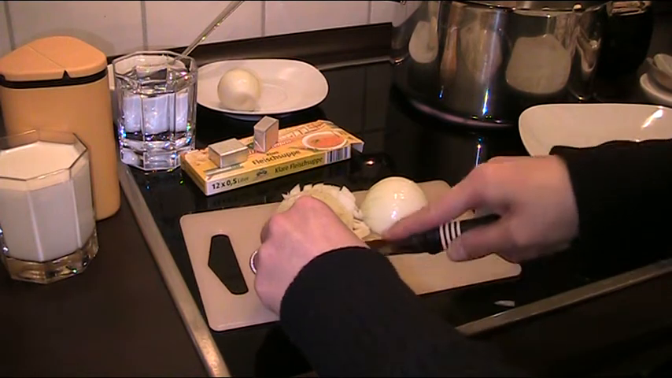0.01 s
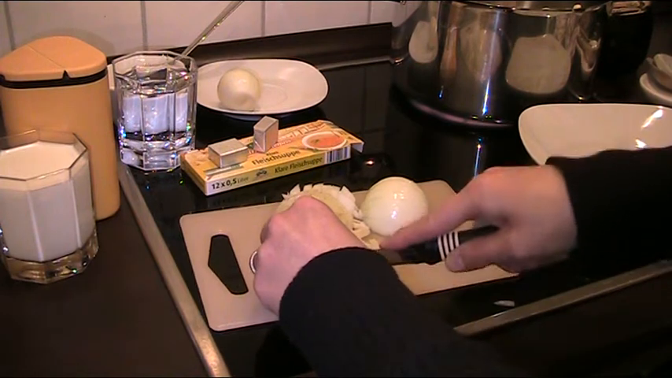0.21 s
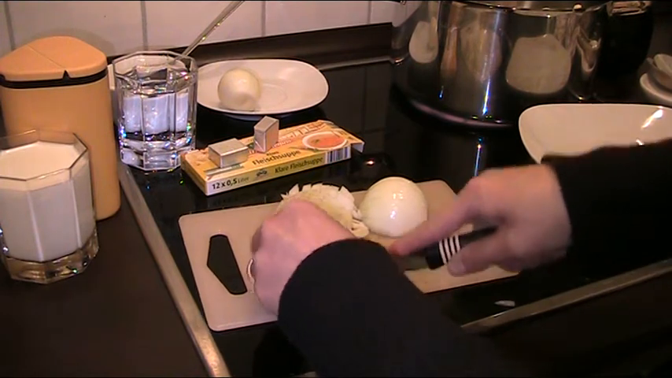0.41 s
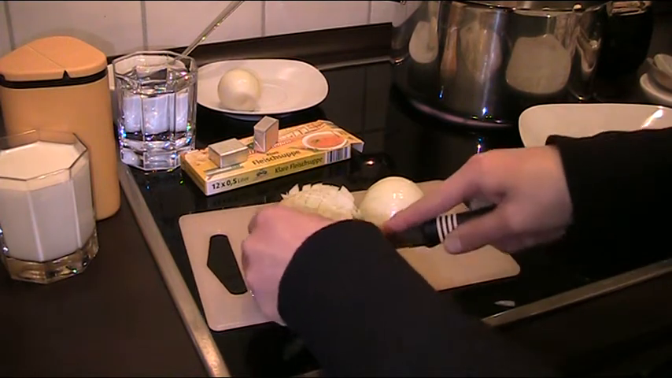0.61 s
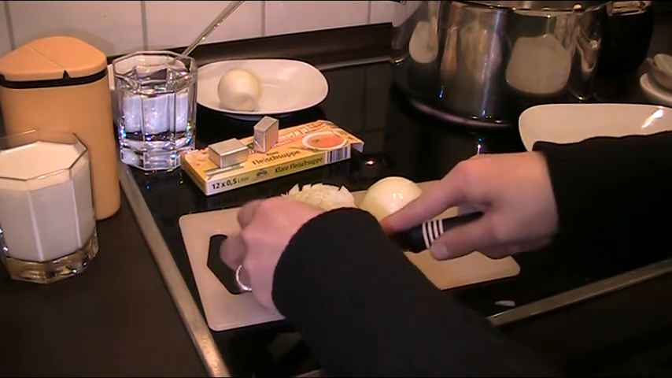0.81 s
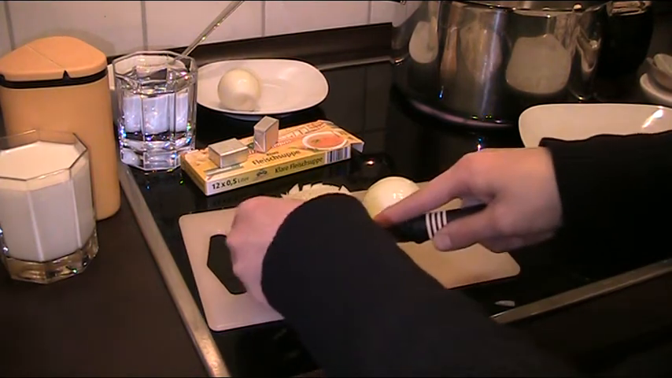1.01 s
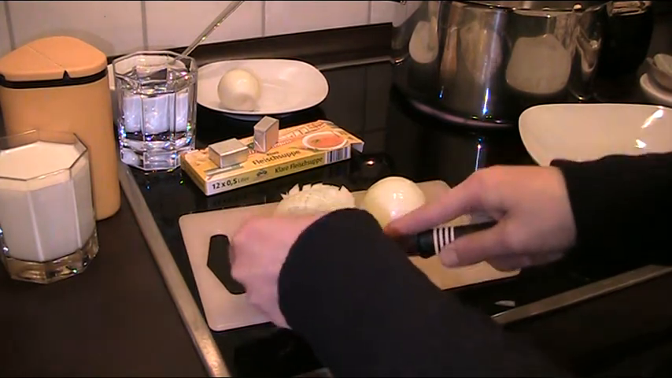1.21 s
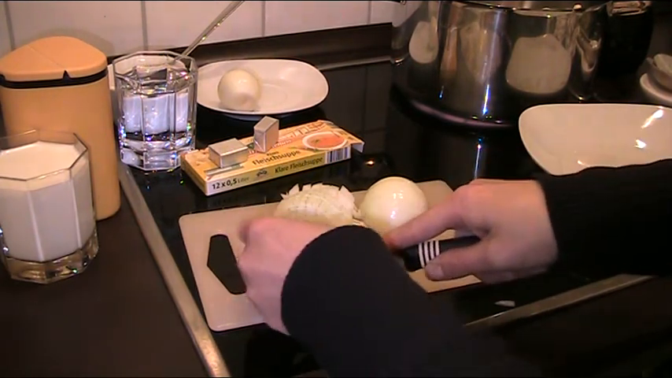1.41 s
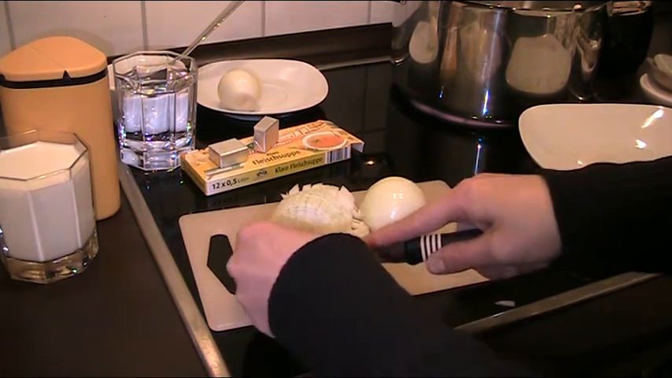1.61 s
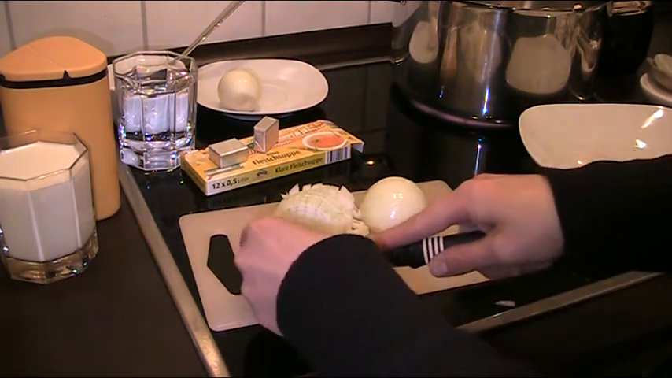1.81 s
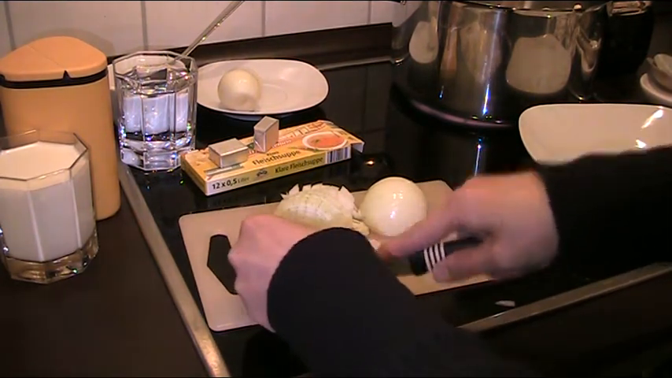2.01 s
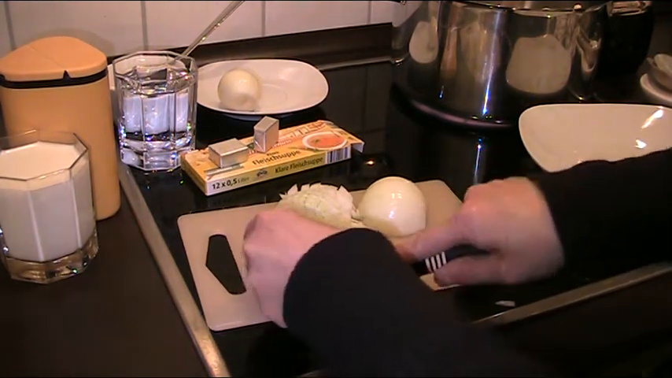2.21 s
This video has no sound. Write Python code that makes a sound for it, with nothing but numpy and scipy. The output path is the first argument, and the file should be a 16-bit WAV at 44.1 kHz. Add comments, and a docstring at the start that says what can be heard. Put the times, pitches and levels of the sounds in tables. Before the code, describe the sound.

Onion cutting heard up close: one sharp clacking knock on a thin plastic board, a long stretch of faint rubbing and ticking pieces, then another crunchy cut and knock, with short kitchen reverberation and low room noise.

```python
"""Onion cut on a kitchen board

A knife goes through an onion and knocks on a plastic board that lies on a cooker top.
Each cut is a crackle of bursting cells; each knock is an edge click, clack, board thud and cooker ring.
Between them pieces rustle, rub and snap, as shaped noise and clicks, over room noise and mains hum.
A hard-walled kitchen adds early echoes and a diffuse tail of decaying noise."""
import sys
import numpy as np
from scipy import signal
from scipy.fft import rfft, irfft
from scipy.io import wavfile

SR = 44100
rng = np.random.default_rng(int(sys.argv[2]) if len(sys.argv) > 2 else 0)


def waveform_to_disk(signal):
    """Save audio, clipped to [-1, 1], as 16-bit WAV at the path in sys.argv[1]."""
    frames = np.transpose(np.atleast_2d(signal))
    scaled = np.clip(frames, -1, 1) * 32767
    samples = np.round(scaled).astype(np.int16)
    wavfile.write(sys.argv[1], SR, samples)


N = 101430


def amp(db):
    """Decibels to gain."""
    return 10 ** (np.asarray(db) / 20)


def unit(x):
    """Scales to rms 1."""
    return x / np.sqrt(np.mean(x ** 2) + 1e-20)


def read(points, hz):
    """Interpolates a (Hz, value) table on a log-frequency axis."""
    f, value = np.transpose(points)
    return np.interp(np.log(hz + 1), np.log(f + 1), value)


def add(mix, start_s, sound):
    """Adds a sound into the mix at a time, cut at the end."""
    part = mix[max(round(start_s * SR), 0):][:len(sound)]
    part += sound[:len(part)]


def click(shape_db):
    """Minimum-phase click of energy 1, its spectrum given as a function of Hz."""
    hz = abs(np.fft.fftfreq(4096, 1 / SR))
    log_gain = np.log(amp(shape_db(hz)) + 1e-4)
    spectrum = np.exp(np.conj(signal.hilbert(log_gain)))
    h = np.fft.ifft(spectrum).real[:2048]
    return h / np.linalg.norm(h)


def colour(x, points):
    """Filters to a (Hz, dB) spectrum, keeping white noise at its level."""
    return signal.fftconvolve(x, click(lambda hz: read(points, hz)))[:len(x)]


def pair(a, b, same, pan_db):
    """Left and right from a shared and an unrelated sound, with a likeness by frequency."""
    likeness = np.clip(read(same, np.fft.rfftfreq(len(a), 1 / SR)), 0, 1)
    mid = rfft(a) * np.sqrt((1 + likeness) / 2)
    side = rfft(b) * np.sqrt((1 - likeness) / 2)
    left = (mid + side) * amp(pan_db / 2)
    right = (mid - side) * amp(-pan_db / 2)
    return irfft(np.array([left, right]), len(a))


def grains(per_s, spread_db):
    """Sparse random impulses of uneven size and either sign: tiny fractures."""
    size = amp(spread_db * np.minimum(rng.exponential(1, N), 4))
    sign = rng.choice([-1, 1], N)
    return unit(size * sign * (rng.random(N) < per_s / SR))


def swell(start_s, length_s, peak):
    """Envelope of one stroke: linear rise to its peak (0-1 of the length), linear fade."""
    corners_s = start_s + length_s * np.array([0, np.clip(peak, .02, .98), 1])
    return np.interp(np.arange(N) / SR, corners_s, [0, 1, 0])


def ring(modes, pitch, rise_s, t):
    """Decaying modes of a struck body; neighbours swing in opposite directions."""
    total = np.zeros(len(t))
    for k, (hz, db, t60_s) in enumerate(modes):
        decay = np.exp(-np.log(1000) * t / t60_s)
        total += (-1) ** k * amp(db) * decay * np.sin(2 * np.pi * hz * pitch * t)
    return (1 - np.exp(-t / rise_s)) * total


# room noise spectrum: freq_hz, relative_level_db
FLOOR_SPECTRUM = [(25, -31), (45, 1), (70, -2), (120, -3), (200, -1.5), (400, -4), (800, -6.5),
                  (1200, -9.5), (2200, -12), (3200, -14.5), (5000, -19), (8500, -20), (10500, -27.5),
                  (15500, -30)]
# room noise left-right likeness: freq_hz, likeness_0_1
FLOOR_LIKENESS = [(50, 0.33), (400, 0.28), (1500, 0.18), (5000, 0.1), (15000, .2)]
# mains hum partials: freq_hz, rms_level_db
HUM_PARTIALS = [(49.5, -74.5), (99, -76.5), (198, -74.5), (247, -77), (790, -75.5)]
FLOOR_DB = -57.5


def background():
    """Quiet room noise, spectrally shaped, plus mains hum as steady sines."""
    gain = amp(read(FLOOR_SPECTRUM, np.fft.rfftfreq(N, 1 / SR)))
    a, b = irfft(rfft(rng.standard_normal((2, N))) * gain, N)
    hum = np.zeros(N)
    for hz, db in HUM_PARTIALS:
        cycles = hz * np.arange(N) / SR + rng.random()
        hum += amp(db) * np.sqrt(2) * np.sin(2 * np.pi * cycles)
    return amp(FLOOR_DB) * pair(unit(a), unit(b), FLOOR_LIKENESS, pan_db=0.1) + hum


# kitchen decay time: freq_hz, t60_s
ROOM_DECAY = [(100, 1.0), (250, 0.65), (500, 0.76), (1000, .66), (1800, 0.72), (4000, 0.61), (8000, .5),
              (15000, .38)]
# diffuse tail spectrum: freq_hz, level_db
ROOM_SPECTRUM = [(50, -7.5), (200, 0), (300, -5), (450, 0.5), (900, -4.5), (1500, -7), (2100, 2),
                 (3000, -2.5), (4200, -4), (5500, 1.5), (8000, -7), (15000, -9.5)]
ROOM_RISE_S = 0.0027


def room_tail():
    """Diffuse decay for two microphones, each band of noise dying at its own speed."""
    hz, t, z = signal.stft(rng.standard_normal((2, SR)), SR, nperseg=256)
    rate = np.log(1000) / read(ROOM_DECAY, hz)[:, None]
    energy_scale = np.sqrt(2 * rate / SR)
    z = z * np.exp(-rate * t) * energy_scale * amp(read(ROOM_SPECTRUM, hz))[:, None]
    tail = signal.istft(z, SR, nperseg=256)[1][:, :SR]
    return tail * np.minimum(np.arange(SR) / SR / ROOM_RISE_S, 1)


# diffuse tail left-right likeness: freq_hz, likeness_0_1
ROOM_LIKENESS = [(100, 1), (450, .97), (1700, 0.87), (3500, 0.45), (7000, .42), (15000, .15)]
ROOM_PAN_DB = 1.5  # left minus right
CRUNCH_ROOM_DB, SHUFFLE_ROOM_DB, SNAP_ROOM_DB = -4, -4, -7.5


def kitchen(count):
    """The board sends a differently scattered sound towards each wall; their tails blend to a wash."""
    wet = np.zeros((2, N))
    for _ in range(count):
        sent = knocks() + amp(CRUNCH_ROOM_DB) * crunch()
        sent += amp(SHUFFLE_ROOM_DB) * shuffles() + amp(SNAP_ROOM_DB) * snaps()
        wet += signal.fftconvolve(sent[None], room_tail(), axes=1)[:, :N]
    return pair(*wet / np.sqrt(count), ROOM_LIKENESS, ROOM_PAN_DB)


# early reflections: delay_s, gain
EARLY_ECHOES = [(.0019, 0.093), (.0044, 0.11), (.0078, .12), (0.0123, -0.102)]
# direct sound left-right likeness: freq_hz, likeness_0_1
NEAR_LIKENESS = [(900, 1), (1700, .993), (3500, .94), (7000, .85), (15000, .5)]
# direct sound balance: freq_hz, left_minus_right_db
NEAR_BALANCE = [(100, 1.4), (1800, 2.3), (3500, 0.8), (8000, -0.1), (15000, -3)]


def near(x):
    """Direct sound with echoes from worktop, pot and tiles; the treble differs between microphones."""
    out = x.copy()
    for delay_s, gain in EARLY_ECHOES:
        add(out, delay_s, gain * x)
    scatter = rng.standard_normal(SR // 700)
    scattered = signal.fftconvolve(out, scatter / np.linalg.norm(scatter))[:N]
    pan_db = read(NEAR_BALANCE, np.fft.rfftfreq(N, 1 / SR))
    return pair(out, scattered, NEAR_LIKENESS, pan_db)


# onion pieces pushed about: start_s, length_s, rustle_db, board_rub_db
SHUFFLE_STROKES = [(-0.01, 0.16, -77, -56.5), (0.395, 0.066, -50, -74), (0.622, 0.046, -63.5, -69),
                   (0.703, 0.068, -63, -76), (0.90, 0.093, -58, -87), (1.162, 0.054, -63.5, -87),
                   (1.231, 0.082, -61.5, -77.5), (1.3, 0.091, -54.5, -53.5), (1.398, 0.082, -56, -67),
                   (1.47, 0.11, -64, -61.5), (1.628, 0.051, -64, -84), (1.743, .08, -62.5, -61),
                   (1.888, 0.085, -56, -66), (2.207, 0.094, -58, -87)]
# rustle spectrum: freq_hz, relative_level_db
RUSTLE_SPECTRUM = [(100, -16.5), (800, -10), (1600, 0.5), (4200, 2.5), (5200, -4), (8500, 1.5),
                   (10300, -13.5), (16000, -21)]
# dull rub spectrum: freq_hz, relative_level_db
RUB_SPECTRUM = [(40, -27), (120, -3), (200, -0.5), (350, 4.5), (600, -13), (1600, -9.5), (4000, -36)]
RUSTLES_PER_S, RUSTLE_SPREAD_DB = 7000, 2
SHUFFLE_PEAK, CLUMP_S, CLUMP_DB = 0.48, .012, 3


def shuffles():
    """Pieces rustle on each other in clumps of fractures and rub on the board as dull noise."""
    strokes = np.array([swell(s, length_s, SHUFFLE_PEAK) for s, length_s, _, _ in SHUFFLE_STROKES])
    _, _, rustle_db, rub_db = np.transpose(SHUFFLE_STROKES)
    clump_steps = np.arange(N) / SR / CLUMP_S
    clumps = amp(CLUMP_DB * np.interp(clump_steps, np.arange(SR), rng.standard_normal(SR)))
    rustle = amp(rustle_db) @ strokes * clumps * grains(RUSTLES_PER_S, RUSTLE_SPREAD_DB)
    rub = amp(rub_db) @ strokes * rng.standard_normal(N)
    return colour(rustle, RUSTLE_SPECTRUM) + colour(rub, RUB_SPECTRUM)


# single wet snaps: start_s, level_db (before SNAP_SPECTRUM), centre_hz, width_octaves, fade_s
SNAP_EVENTS = [(0.0185, -34, 8350, 0.43, 0.0034), (0.037, -40, 7800, .3, 0.003),
               (0.197, -29, 3950, 1.5, 0.0012), (0.425, -24, 7300, 0.28, 0.0039),
               (0.457, -25, 7360, 1.4, 0.0035), (1.010, -41, 5000, 1, .001), (1.083, -35.5, 4500, 1, .001),
               (1.2009, -20.5, 2400, 1.4, 0.00013), (1.307, -31, 3480, 0.54, .002),
               (1.432, -36, 4000, 0.35, 0.0023), (1.598, -37.5, 4200, 0.62, .001),
               (1.676, -31.5, 3180, 0.064, .0015), (1.9163, -35, 5500, .8, 0.0006),
               (2.16, -35, 8200, 0.76, .003), (2.24, -30.5, 4100, 0.82, 0.00069)]
# spectrum common to all snaps: freq_hz, relative_level_db
SNAP_SPECTRUM = [(400, -12.5), (1000, 2), (4200, -1.5), (5000, -8), (6500, -1), (9000, -1), (11500, -11.5),
                 (16000, -15)]
SNAP_GRIT = .5  # noise against the first impulse


def snaps():
    """Single pieces snap or come unstuck: a gritty burst through a resonance of its own pitch."""
    out, t = np.zeros(N), np.arange(SR // 20) / SR
    for start_s, db, centre_hz, octaves, fade_s in SNAP_EVENTS:
        def peak_db(hz):
            """Resonance falling off with distance in octaves."""
            distance = np.log2((hz + 1) / centre_hz) / octaves
            return -20 * np.log10(1 + distance ** 2)

        burst = (t == 0) + SNAP_GRIT * rng.standard_normal(len(t)) * np.exp(-t / fade_s)
        snap = signal.fftconvolve(burst, click(peak_db))
        add(out, start_s, amp(db) * snap / np.linalg.norm(snap))
    return colour(out, SNAP_SPECTRUM)


# blade splitting onion layers: start_s, length_s, level_db, peak_place_0_1
CUT_STROKES = [(0.2442, 0.015, -22.5, 0.3), (1.947, 0.037, -39.5, 0.38), (1.9795, 0.029, -24.5, 0.57)]
# crunch spectrum: freq_hz, relative_level_db
CRUNCH_SPECTRUM = [(60, -27), (180, -12), (400, 16.5), (800, 2.5), (1600, 7), (2400, 5.5), (4000, 2.5),
                   (8800, 2.5), (11000, -14.5), (16000, -21.5)]
CELLS_PER_S, CELL_SPREAD_DB = 20000, 1.5


def crunch():
    """Cells burst in a dense crackle while the blade moves through the onion."""
    force = sum(amp(db) * swell(s, length_s, peak) for s, length_s, db, peak in CUT_STROKES)
    return colour(force * grains(CELLS_PER_S, CELL_SPREAD_DB), CRUNCH_SPECTRUM)


BOARD_Q, BOARD_CUT_HZ = 10, 220


def plastic(modes):
    """Plastic damps every mode within the same few cycles: (Hz, dB) to (Hz, dB, t60 s)."""
    return [(hz, db, np.log(1000) * BOARD_Q / (np.pi * hz)) for hz, db in modes]


def small_plate(x):
    """A small board radiates little bass."""
    return signal.sosfilt(signal.butter(3, BOARD_CUT_HZ, "highpass", fs=SR, output="sos"), x)


# blade meets board: start_s, clack_db, thud_db, cooker_db, edge_click_db, board_pitch_factor
KNOCK_EVENTS = [(0.2102, -15, -30.5, -29, -16.5, 0.89), (0.2463, -9.5, -10.5, -20.5, -26, .92),
                (0.252, 1, -12, -18, -0.5, 0.96), (1.9981, -5.5, -14, -28.5, -9, 0.94),
                (2.2958, -24.5, -35, -51, -17, 0.98)]
# blade on plastic: freq_hz (before board_pitch_factor), relative_level_db
CLACK_MODES = [(1380, -11.5), (1620, -2), (1830, -2.5), (2200, -10), (2700, -23.5), (3300, -24.5),
               (3900, -36.5)]
# board thud: freq_hz (before board_pitch_factor), relative_level_db
THUD_MODES = [(235, -15.5), (300, -12), (400, -8), (490, -1.5)]
# glass cooker top under the board: freq_hz (before COOKER_PITCH), relative_level_db, t60_s
COOKER_MODES = [(42.2, -20.5, 0.14), (109.1, -17, 0.72), (694, -3, 0.042), (868, -1, 0.051),
                (1034, -3.5, 0.052), (1321, -3.5, .04)]
# edge click spectrum: freq_hz, relative_level_db
EDGE_SPECTRUM = [(100, -42.5), (600, -3.5), (2000, -3.5), (4200, 2), (5000, -14.5), (6500, -7),
                 (9000, -9.5), (11000, -18), (16000, -18)]
EDGE_SCATTER, EDGE_FADE_S = 0.19, 0.0037
CLACK_RISE_S, THUD_RISE_S, COOKER_RISE_S = 0.00035, 0.002, 0.00038
COOKER_PITCH = 0.93


def knocks():
    """The blade lands: an edge click excites clack and thud modes of the board and the cooker top."""
    out, t = np.zeros(N), np.arange(SR // 2) / SR
    for start_s, clack_db, thud_db, cooker_db, edge_db, pitch in KNOCK_EVENTS:
        contact = (t == 0) + EDGE_SCATTER * rng.standard_normal(len(t)) * np.exp(-t / EDGE_FADE_S)
        edge = amp(edge_db) * colour(contact, EDGE_SPECTRUM)
        clack = amp(clack_db) * ring(plastic(CLACK_MODES), pitch, CLACK_RISE_S, t)
        thud = amp(thud_db) * ring(plastic(THUD_MODES), pitch, THUD_RISE_S, t)
        cooker = amp(cooker_db) * ring(COOKER_MODES, COOKER_PITCH, COOKER_RISE_S, t)
        add(out, start_s, edge + small_plate(clack + thud) + cooker)
    return out


def scene():
    """All the work on the board, direct and through the kitchen, over the background."""
    direct = near(knocks() + crunch() + shuffles() + snaps())
    return direct + kitchen(count=3) + background()


LOW_CUT_HZ, EDGE_HZ, CEILING = 27, 15760, 1.0


def record(dry):
    """The microphone drops the deepest bass; peaks over the ceiling clip; then the band limit."""
    low_cut = signal.butter(2, LOW_CUT_HZ, "highpass", fs=SR, output="sos")
    heard = np.clip(signal.sosfilt(low_cut, dry), -CEILING, CEILING)
    band_limit = signal.firwin(511, EDGE_HZ, window=("kaiser", 9), fs=SR)
    return signal.oaconvolve(heard, band_limit[None], "same")


dry = scene()
out = record(dry)
waveform_to_disk(out)
```